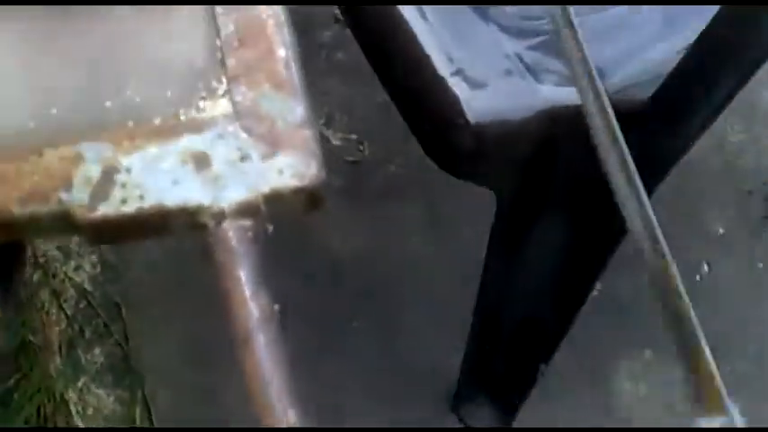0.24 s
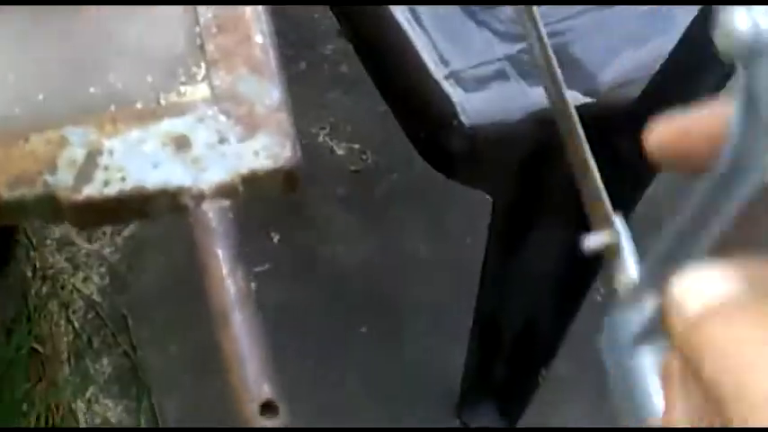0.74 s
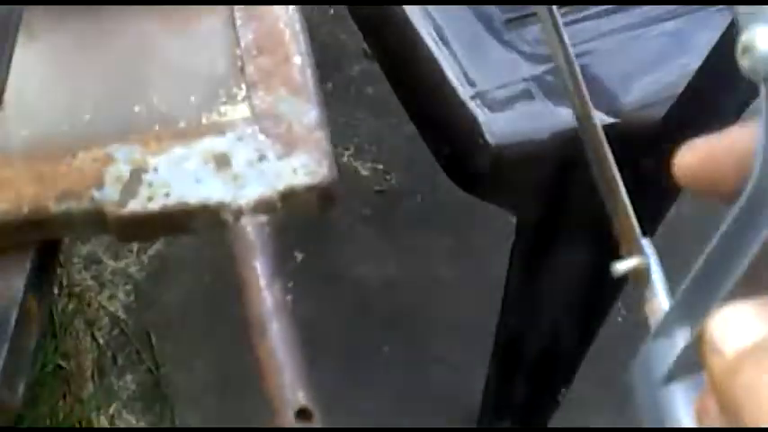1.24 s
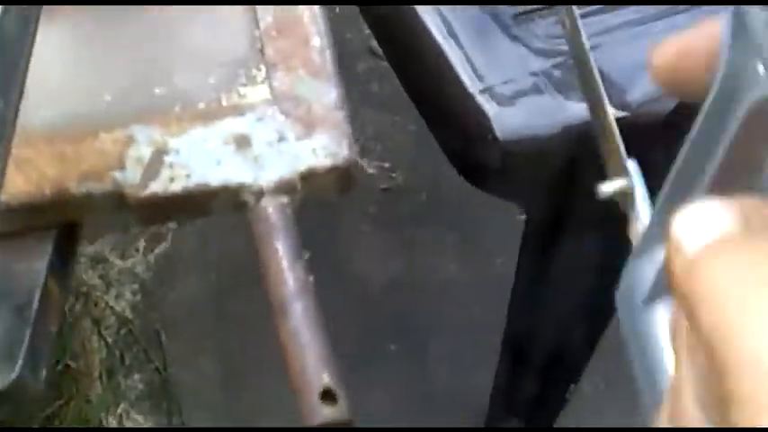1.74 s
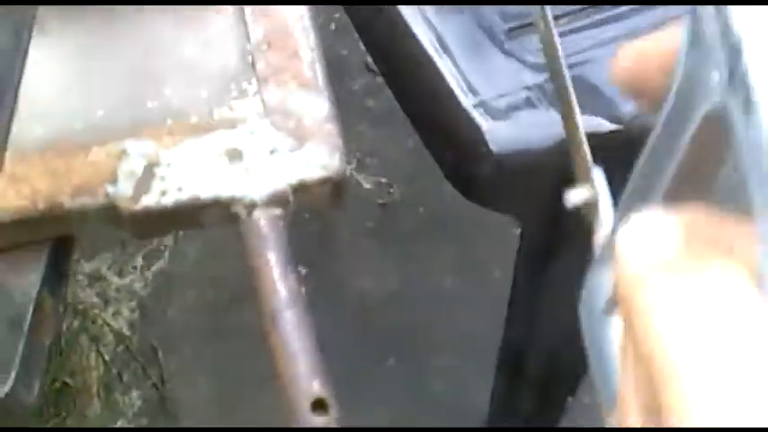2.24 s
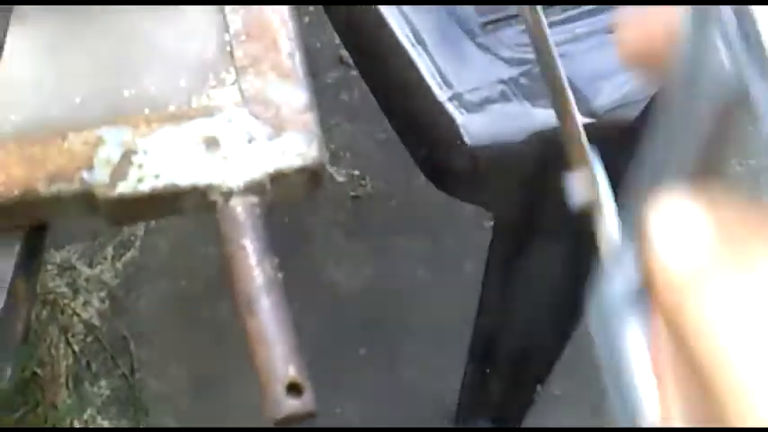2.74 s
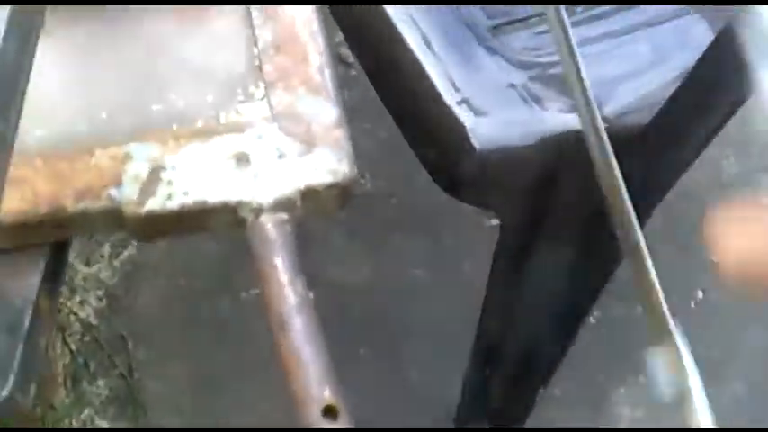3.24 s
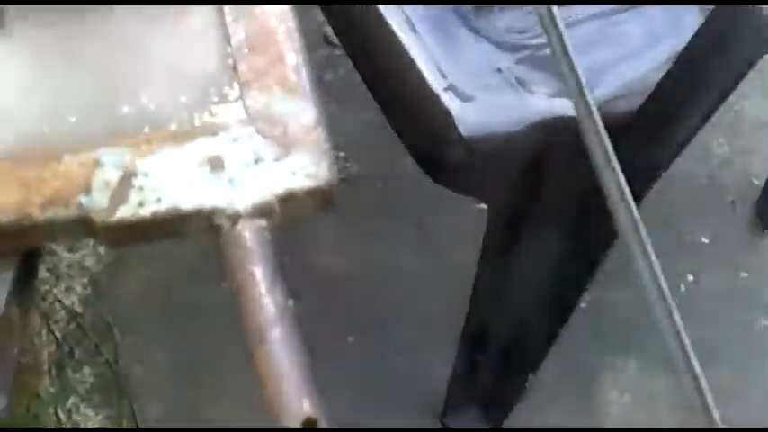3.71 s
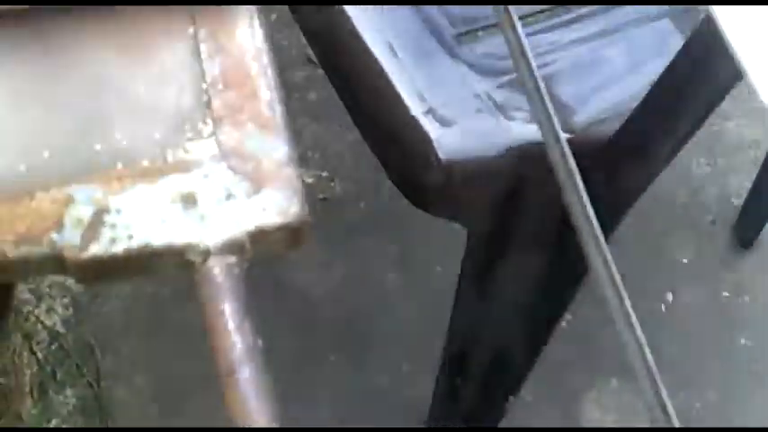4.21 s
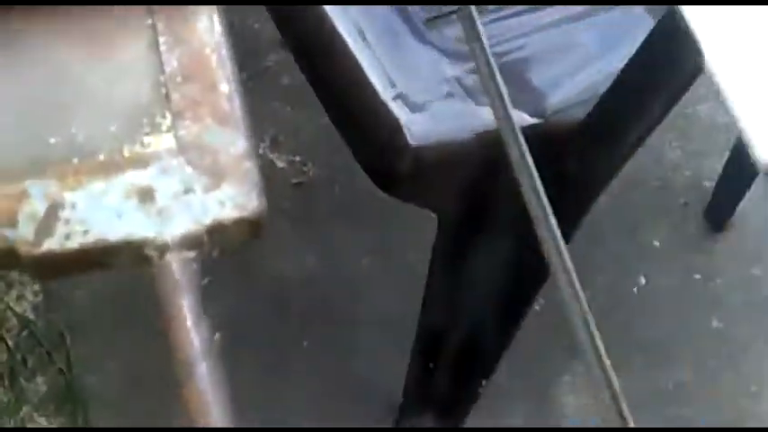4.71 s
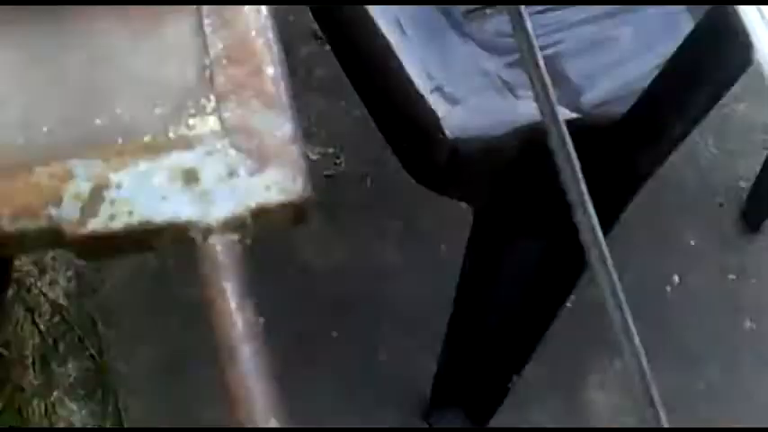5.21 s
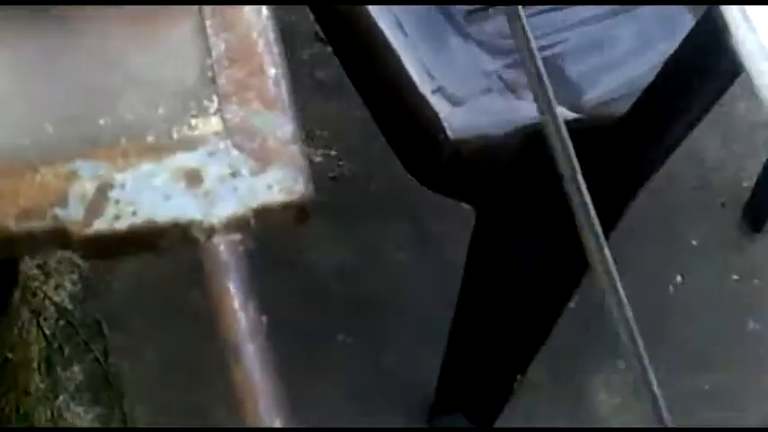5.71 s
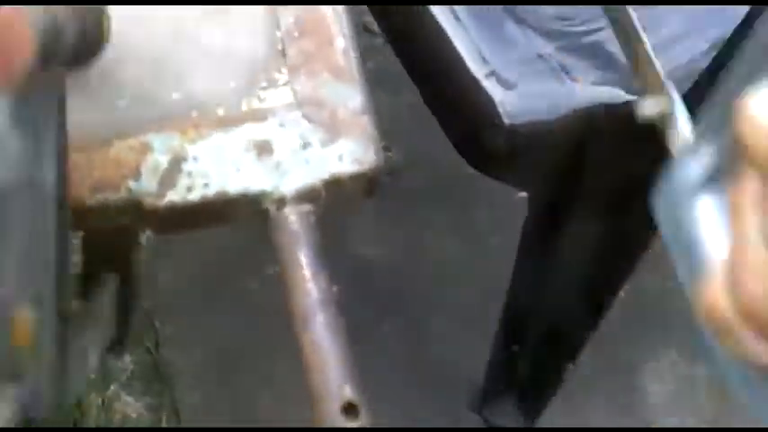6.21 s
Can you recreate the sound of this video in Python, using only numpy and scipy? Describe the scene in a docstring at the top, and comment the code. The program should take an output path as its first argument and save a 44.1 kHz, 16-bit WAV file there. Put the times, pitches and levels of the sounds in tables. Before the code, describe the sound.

A hacksaw is already cutting a copper pipe clamped to a steel table in a quiet yard, very close to the microphone. Strokes turn about every 0.27 seconds, each speeding up into a gritty, buzzing metallic rasp and slowing to a near gap. Until about 1.9 seconds they are fairly light, with small catches and a low puff of air near 0.65. From 2 seconds the bite gets stronger; dull table bumps and a heavy gust come around 2.25. Faint, very high squeals thread the strokes from 2.75 to 3.85, and a lower squeal sounds at 4.1-4.4. Loud strokes alternate with weaker ones, then nearly all are forceful after 4.9, with gust rumbles at 5.3 and 5.5. Around 6.15 the blade breaks through: a quick burst of bright clanks, a brief lull with light rattling, then clatter and heavy thuds at 6.37-6.42. The loudest peaks distort; reflections are short and weak.

```python
"""Outdoors in a yard, a hacksaw cuts a copper pipe clamped to a steel table, close to a small overloaded microphone.
Each stroke speeds up and slows down: tooth strikes, low shoves and noisy chips excite the metal's resonances.
Some strokes squeal, the table bumps dully, and gusts from the moving hand rumble over a light breeze.
At the end the blade breaks through, and the saw clatters against pipe and table in bursts, rings and thuds."""
import sys
import numpy as np
from scipy import signal
from scipy.fft import rfft, irfft, next_fast_len
from scipy.io import wavfile
from scipy.ndimage import uniform_filter1d, minimum_filter1d, map_coordinates

SR = 44100
rng = np.random.default_rng(int(sys.argv[2]) if len(sys.argv) > 2 else 0)


def log_audio(samples):
    """Write samples as a 16-bit WAV file to the path given in sys.argv[1]."""
    # one column per channel
    frames = np.atleast_2d(samples).T
    # limit to full scale, then quantise
    limited = np.clip(frames, -1, 1)
    pcm = np.round(limited * 32767).astype(np.int16)
    wavfile.write(sys.argv[1], SR, pcm)


N = 284524
TIME = np.arange(N) / SR
PADDED = next_fast_len(N + SR // 2, real=True)
FREQ = np.fft.rfftfreq(PADDED, 1 / SR)

# saw strokes, push and pull in turn: (start [s], top tooth rate before judder [Hz],
# lag of the fastest moment [stroke lengths], tooth hum before the speed factor [dB],
# pressure at mid stroke [dB], pressure slope around mid stroke [dB per stroke length])
STROKE_TABLE = [(-0.24, 917, 0, -2, -19, 1.5), (0.03, 960.5, 0.06, 7, -21, -8.5),
                (0.302, 974.6, 0.02, 4.5, -19, -9.5), (0.585, 958, 0.11, 9.5, -17.5, -17),
                (0.865, 1041, -0.056, 1, -18, 2.5), (1.124, 989, -0.025, 7, -20.5, 7.5),
                (1.4, 930.6, 0.044, 4, -19, -6), (1.672, 1044, 0.083, 9, -17.5, 1),
                (1.947, 1004, -0.054, -25, -11, -16.5), (2.201, 939, 0.059, 4, -13, -23.5),
                (2.479, 927.8, 0.11, -3, -20, -16.5), (2.75, 1227, 0.021, 1.5, -11.5, -7.5),
                (3.015, 1013, -0.085, -19, -10, 15), (3.283, 1172, -0.059, 6, -7.5, -6),
                (3.552, 990, 0.02, -2, -14, -9.5), (3.841, 1161, 0.076, 5.5, -5.5, -11.5),
                (4.086, 969, 0.02, 6, -18, -5), (4.36, 1143, 0.014, 6.5, -5.5, -9),
                (4.634, 964, 0.14, 5.5, -19.5, -7), (4.916, 1294, -0.1, 4, -6.5, 0.5),
                (5.185, 1198, 0.0045, 6, -12, -12), (5.44, 1223, 0.12, 5.5, -8, -27),
                (5.695, 1242, 0.0043, -11, -12, -9), (5.974, 1176, 0, 5.5, -11, -7)]
LAST_STROKE_END_S = 6.26


def undb(db):
    """Decibels to gain."""
    return 10 ** (np.asarray(db) / 20)


def unit(x):
    """Scale to rms 1."""
    return x / np.sqrt(np.mean(x ** 2))


def noise():
    """White noise."""
    return rng.standard_normal(N)


def walk(rate):
    """Smooth random drift with a spread near 1, taking a new value rate times a second."""
    return 1.2 * np.interp(TIME * rate, np.arange(N), noise())


def colour(points):
    """Gain at every frequency from (frequency [Hz], level [dB]) points."""
    hz, db = np.transpose(points)
    return undb(np.interp(np.log(FREQ + 1), np.log(hz), db))


def resonance(hz, width):
    """Response of one resonance, gain 1 at its centre."""
    return 1j * FREQ * width / (hz ** 2 - FREQ ** 2 + 1j * FREQ * width)


def through(x, response):
    """Filter a sound by a frequency response."""
    return irfft(rfft(x, PADDED) * response, PADDED)[:N]


def fade(start, decay):
    """Sudden onset, then exponential decay to 1/e in decay seconds."""
    return (TIME >= start) * np.exp(-np.maximum(TIME - start, 0) / decay)


def struck(hits, modes):
    """Blows (time [s], level [dB]) ring decaying modes (frequency [Hz], level [dB], t60 [s])."""
    blows = np.zeros(N)
    for s, db in hits:
        blows[int(s * SR)] += undb(db)
    t = TIME[:SR // 2]
    ring = sum(undb(db - 60 * t / t60) * np.sin(2 * np.pi * hz * t) for hz, db, t60 in modes)
    return signal.fftconvolve(blows, ring)[:N]


def stroke_place():
    """Strokes done so far; the fraction is the way along the present one."""
    turns = np.append(np.array(STROKE_TABLE)[:, 0], LAST_STROKE_END_S)
    return np.interp(TIME, turns, np.arange(len(turns)))


def air():
    """Gusts swell and die over a light breeze at the microphone and the faint hush of the yard."""
    # gusts from the moving hand: (peak time [s], level [dB], half width [s])
    gust_table = [(0.43, -25.5, 0.057), (0.642, -17, 0.01), (0.72, -24, .02), (1.3, -28, 0.034),
                  (1.83, -30.5, .06), (2.269, -7.5, 0.045), (2.805, -16.5, 0.028), (3.135, -16.5, .033),
                  (3.21, -22, 0.039), (3.325, -13, 0.04), (3.675, -21.5, 0.032), (3.9, -18, 0.042),
                  (4.47, -29, 0.052), (5.03, -16, 0.011), (5.28, -9.5, 0.019), (5.35, -17, 0.014),
                  (5.44, -17, 0.029), (5.528, -7, .018), (5.79, -13.5, 0.022), (6.04, -24, .06),
                  (6.42, -20, .06)]
    # the light breeze drops for a while and returns: (time [s], level [dB])
    breeze_levels = [(0, -33.5), (1.1, -36.5), (3.6, -35.5), (4.3, -42), (4.85, -45), (5.3, -34),
                     (6.45, -34)]
    # colour of air buffeting the microphone: (frequency [Hz], relative level [dB])
    buffet_colour = [(20, -11), (45, -3), (90, 2.5), (180, -2.5), (300, -11), (450, -13.5), (900, -35),
                     (3000, -75)]
    # colour of the yard's hush: (frequency [Hz], relative level [dB])
    hush_colour = [(30, -15), (60, -13), (115, 1.5), (200, -4), (400, -2.5), (1000, -6.5), (4000, -26),
                   (15000, -43)]
    hush_db = -36
    flutter_db, flutter_rate = 2.5, 40  # turbulence of gusts and breeze, changes per second

    gusts = sum(undb(db) * np.exp(-.5 * ((TIME - s) / width) ** 2) for s, db, width in gust_table)
    breeze = undb(np.interp(TIME, *np.transpose(breeze_levels)))
    flow = np.hypot(gusts, breeze) * undb(flutter_db * walk(flutter_rate))
    rumble = flow * unit(through(noise(), colour(buffet_colour)))
    hush = undb(hush_db) * unit(through(noise(), colour(hush_colour)))
    return rumble + hush


def yard(x):
    """Weak, short reflections from the ground and things nearby, as one diffuse tail."""
    tail = unit(noise() * fade(0.0061, 0.02)) / np.sqrt(N)
    return x + undb(-17.0) * signal.fftconvolve(x, tail)[:N]


def knocks():
    """Each blow is a short noisy clash, a ring of free metal and a thud of the table; dull bumps join in."""
    # blows of the saw: (time [s], clash level [dB], clash centre [Hz], clash decay [s],
    # ring drive [dB], thud drive [dB])
    blow_table = [(6.1518, -3, 4575, 0.0018, -11.5, -33), (6.161, 1, 4160, 0.0016, -5.5, -29),
                  (6.167, -5.5, 1310, 0.026, -39.5, -34), (6.1882, -4.5, 2700, 0.0087, -20, -27),
                  (6.204, -13, 1560, 0.01, -16, -14), (6.2644, -28, 2540, 0.0037, -28, -16),
                  (6.3, -21.5, 1700, 0.0069, -31, -37), (6.312, -38, 2520, 0.008, -27, -55),
                  (6.372, -18, 4900, 0.0065, -18.5, -40), (6.3792, -6.5, 4200, 0.0041, -23, -14),
                  (6.385, -18, 4520, 0.0028, -36, -13), (6.391, -8, 700, 0.018, -40, -5),
                  (6.405, -3.5, 1820, 0.011, -37, -4), (6.4129, -16.5, 2460, 0.026, -24, -13)]
    # free ring of the struck metal: (frequency [Hz], relative level [dB], t60 [s])
    metal_modes = [(389.2, -2, 0.29), (903, -8, 0.17), (1389, -5.5, 0.17), (2900, -13, 0.18),
                   (3070, -10, 0.15), (3960, 3, 0.092), (5330, -8.5, 0.082), (6901, -31, .15),
                   (8700, -34, 0.077), (8600, -37, 0.088)]
    # low modes of the table: (frequency [Hz], relative level [dB], t60 [s])
    table_modes = [(80, -17, 0.088), (169, -8.5, 0.068), (292.93, 5.5, 0.019)]
    # dull bumps of the table as the saw jolts it: (time [s], drive level [dB])
    bump_hits = [(.630, -7.5), (2.246, -6), (2.29, -1), (3.303, -9.5), (5.021, -16), (5.232, -13),
                 (5.276, -11), (5.334, -25), (5.52, -3.5), (6.05, -9.5)]

    clashes = np.zeros(N)
    for s, db, hz, decay, _, _ in blow_table:
        burst = unit(through(noise(), resonance(hz, .5 * hz) * resonance(hz, 3 * hz)))
        clashes += undb(db) * fade(s, decay) * burst
    rings = [(s, ring_db) for s, _, _, _, ring_db, _ in blow_table]
    thuds = [(s, thud_db) for s, _, _, _, _, thud_db in blow_table]
    return clashes + struck(rings, metal_modes) + struck(thuds + bump_hits, table_modes)


def arm():
    """Tooth rate, cutting force and hum: the blade slows to a stop at each turn and runs fastest near mid stroke."""
    # teeth catch in the kerf: (time [s], extra force [dB], decay of that extra [s])
    catch_table = [(0.15, 9, 0.016), (0.717, 13, 0.028), (1.258, 12.5, 0.044), (1.427, 15, 0.0079),
                   (1.49, 15, 0.03), (1.737, 10, 0.025), (1.807, 8, 0.047), (2.005, 15, 0.012),
                   (2.268, 8, 0.015), (2.34, 8, 0.031), (2.495, 10, 0.015), (2.6, 7, 0.033),
                   (2.674, 7.5, 0.025), (2.804, 7.5, 0.026), (3.051, 12, 0.013), (3.066, 14.5, 0.019),
                   (3.162, 4.5, 0.03), (3.334, 9, 0.0055), (3.384, 6, 0.015), (3.579, 11.5, 0.021),
                   (3.593, 12.5, 0.025), (3.885, 10, 0.021), (4.123, 11, 0.022), (4.396, 5, 0.012),
                   (4.552, 3, 0.03), (4.966, 7.5, 0.028), (5.224, 7, 0.023), (5.486, 6.5, 0.032),
                   (5.826, 8.5, 0.029), (6.017, 10.5, 0.016), (6.076, 11, 0.019)]
    # off mid stroke, pressure moves towards the saw's resting weight by this share, over this part of a stroke
    resting_db, ease_share, ease_strokes = -19.5, 0.68, 0.36
    tremble_db, tremble_rate = 1.0, 120  # unevenness of the pressure, changes per second
    breakthrough_s, breakthrough_decay_s = 6.12, 0.04  # the force dies away once the blade is through

    rows, place = np.array(STROKE_TABLE), stroke_place()
    stroke = np.minimum(place.astype(int), len(rows) - 1)
    top_hz, lag, hum_db, mid_db, slope_db = rows[stroke, 1:].T
    along = place % 1
    speed = np.abs(np.sin(np.pi * (along - lag * np.sin(np.pi * along))))  # 1 at the fastest moment

    off_middle = np.clip(along - .5, -ease_strokes, ease_strokes)
    eased = ease_share * (off_middle / ease_strokes) ** 2
    pressure_db = mid_db + eased * (resting_db - mid_db) + slope_db * off_middle
    catch_db = sum(db * fade(s, decay) for s, db, decay in catch_table)
    pressure = undb(pressure_db + catch_db + tremble_db * walk(tremble_rate))
    in_kerf = np.exp(-np.maximum(TIME - breakthrough_s, 0) / breakthrough_decay_s)
    force = pressure * (speed ** 1.58 + 0.0065) * in_kerf

    tooth_hz = top_hz * speed ** .8
    # slow teeth dig deeper and hum more
    hum = undb(hum_db) / (speed + .45)
    return tooth_hz, force, hum


def squeals(force):
    """Unsteady sine notes, two very high and one lower, of the blade rubbing the kerf walls."""
    # (start [s], end [s], first pitch [Hz], last pitch [Hz], level relative to the cutting force [dB])
    squeal_table = [(2.75, 3.3, 13950, 13620, -24), (3.28, 3.849, 13560, 13600, -21),
                    (4.106, 4.377, 1660, 1626, -3)]
    out = np.zeros(N)
    for start, end, first_hz, last_hz, db in squeal_table:
        along = np.clip((TIME - start) / (end - start), 0, 1)
        pitch = (first_hz + (last_hz - first_hz) * along) * (1 + .004 * walk(400))
        swell = 2 * np.sqrt(along * (1 - along))  # silent at both ends, 1 halfway
        out += undb(db + 2.9 * walk(50)) * swell * np.sin(2 * np.pi * np.cumsum(pitch) / SR)
    return force * out


def saw(tooth_hz, force, hum):
    """Every tooth shoves the pipe, strikes the kerf and tears a crackling chip; all of it rings the metal."""
    # broad colour of the rasp: (frequency [Hz], relative level [dB])
    rasp_colour = [(100, -17.5), (300, -17), (480, -15.5), (750, -10.5), (1300, 1), (1800, 1.5),
                   (2600, -0.5), (4000, 4.5), (5400, -4.5), (6500, -1), (8000, -16), (9700, -15),
                   (13500, -35.5), (15600, -27)]
    # resonances of pipe, blade and frame: (frequency [Hz], width [Hz], relative level [dB])
    saw_modes = [(479, 37, -14), (619.7, 12.6, 2.5), (785.6, 14.98, 0), (945, 34.4, 8), (1055, 48, 1),
                 (1196.5, 68, 4), (1475, 49, -0.5), (1683, 20, -1.5), (2380, 28, -28), (2573, 52, 3),
                 (2770, 128, 2), (3320, 31, -2), (3286, 173, 0.5), (3600, 19, -15), (3696, 115, 0),
                 (4045, 107, -4.5), (5000, 36, -5.5), (5960, 2.1, -3.5), (6040, 44, 3), (6370, 110, -7.5),
                 (7150, 210, -10), (7474, 106, -11), (8410, 48, -12)]
    # the freed blade rattles lightly against the pipe: (time [s], drive level [dB])
    rattle_levels = [(6.14, -91), (6.17, -37), (6.25, -36), (6.33, -35), (6.37, -23.5), (6.45, -29)]

    judder_hz = 70 * walk(330) + 20 * walk(45)
    phase = np.cumsum(np.maximum(tooth_hz + judder_hz, 0)) / SR  # counts teeth
    tooth = phase.astype(int)
    # no two teeth cut equally deep
    bite = undb(2.2 * noise())[tooth]

    wave = np.sin(2 * np.pi * phase) + .3 * np.cos(4 * np.pi * phase)
    shoves = unit(wave * bite ** 2 * undb(2.5 * walk(70))) * hum
    strikes = unit(np.diff(tooth, prepend=0) * bite)
    # sample-by-sample level jumps make the chips crackle; they fade towards the next tooth
    chips = unit(noise() * undb(2.45 * noise()) * bite * np.exp(-(phase % 1) / 0.68))
    rattle = undb(np.interp(TIME, *np.transpose(rattle_levels)) + 4.0 * walk(200)) * noise()
    cutting = undb(-7.5) * strikes + undb(-1.5) * chips + undb(-16.0) * shoves
    drive = force * cutting + rattle

    # the contact point travels along the blade, so each resonance swells and fades on its own
    spectrum = rfft(drive, PADDED)
    ring = np.zeros(N)
    for hz, width, db in saw_modes:
        mode = irfft(spectrum * resonance(hz, width), PADDED)[:N]
        ring += undb(db + 2.0 * walk(14)) * mode

    # the many weak modes of table and frame smear each click for a few milliseconds
    smear = .3 * rfft(unit(noise() * fade(0, .006)) / np.sqrt(N), PADDED)
    rasp = through(drive, colour(rasp_colour) * (1j + smear))  # 1j: direct part, a quarter turn in phase
    # the echo from the blade's end comes sooner or later as the blade slides: a moving comb
    echo_s = .0022 + 0.001093 * np.cos(np.pi * stroke_place())
    echo = map_coordinates(rasp, [(TIME - echo_s) * SR], order=3)
    rasp = rasp + undb(-9.0) * echo
    return undb(4.0) * rasp + undb(7.5) * ring


def scene():
    """Saw, squeals and blows with their reflections, and the air, at one microphone."""
    tooth_hz, force, hum = arm()
    metalwork = saw(tooth_hz, force, hum) + squeals(force) + knocks()
    return (yard(metalwork) + air())[None]


def record(dry):
    """A fast limiter holds down the loudest peaks, what is left overloads; the top is rounded and cut."""
    ceiling_db, top_hz = 3, 15700  # limiter ceiling re full scale; steep treble cut
    size = SR // 300  # limiter window, about 3 ms
    gain = np.minimum(1, undb(ceiling_db) / (np.abs(dry) + 1e-9))
    limited = dry * uniform_filter1d(minimum_filter1d(gain, size), size)
    clipped = limited / (1 + limited ** 16) ** (1 / 16)  # near-hard clip at full scale
    rounded = signal.sosfilt(signal.butter(2, 15000, fs=SR, output="sos"), clipped)
    return signal.sosfilt(signal.ellip(12, .1, 80, top_hz, fs=SR, output="sos"), rounded)


dry = scene()
out = record(dry)
log_audio(out)
```